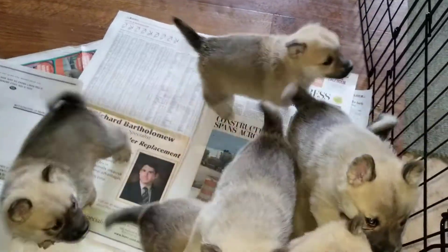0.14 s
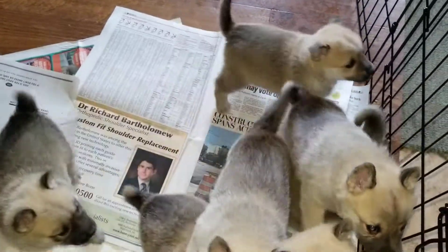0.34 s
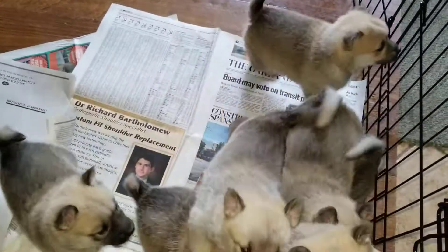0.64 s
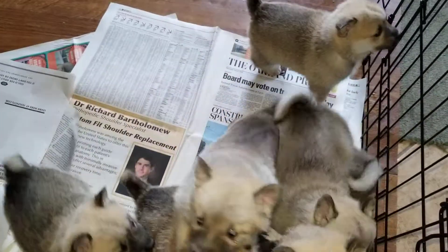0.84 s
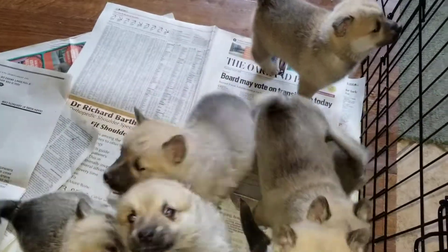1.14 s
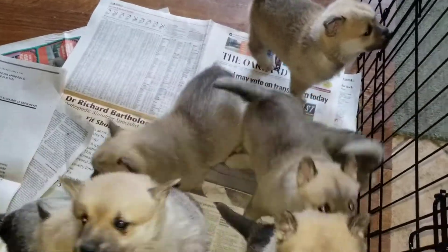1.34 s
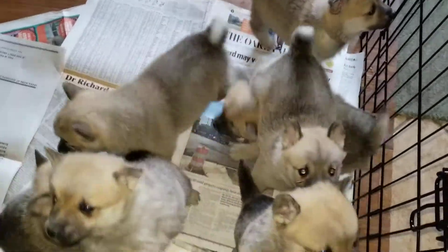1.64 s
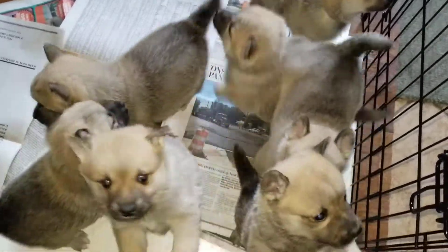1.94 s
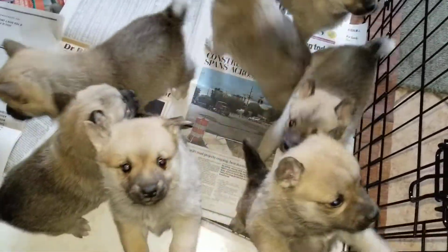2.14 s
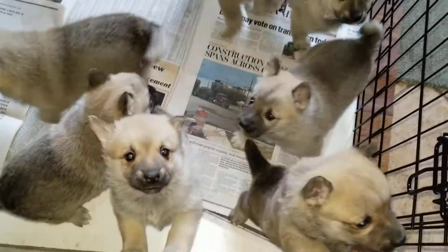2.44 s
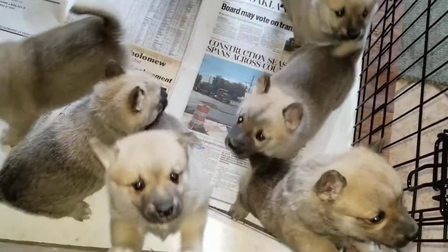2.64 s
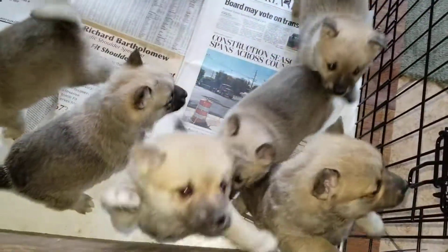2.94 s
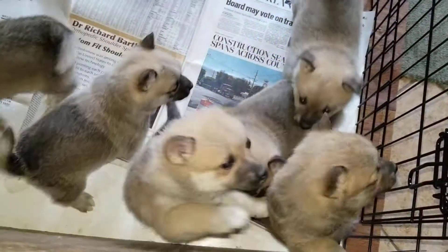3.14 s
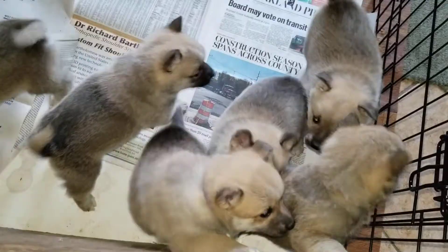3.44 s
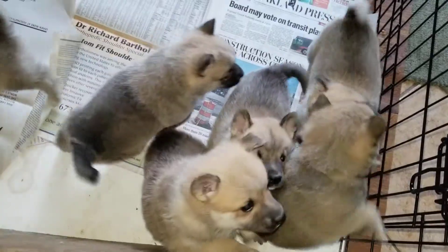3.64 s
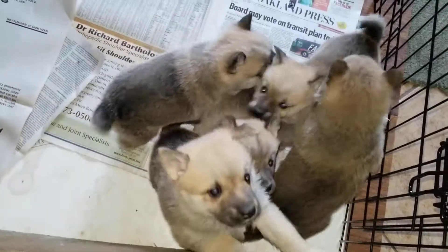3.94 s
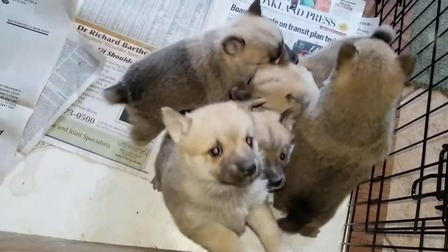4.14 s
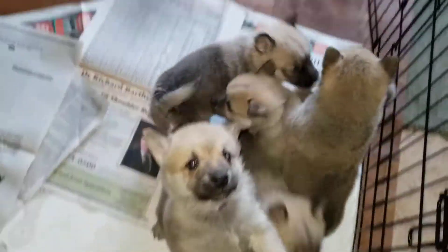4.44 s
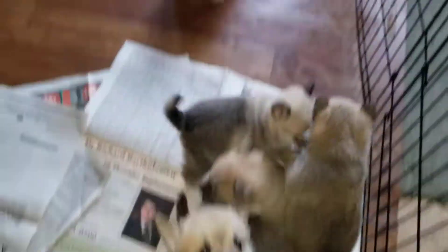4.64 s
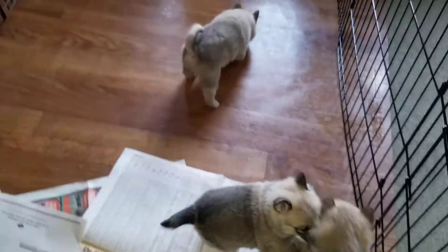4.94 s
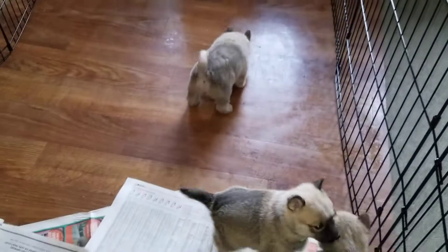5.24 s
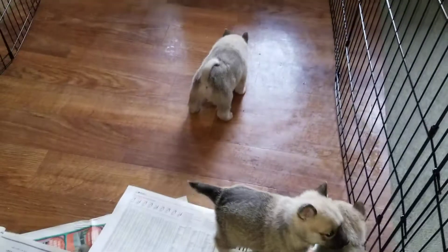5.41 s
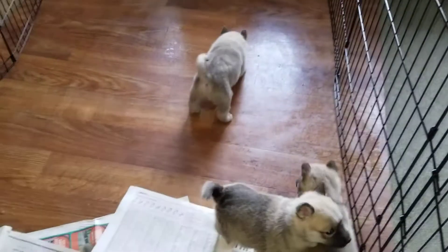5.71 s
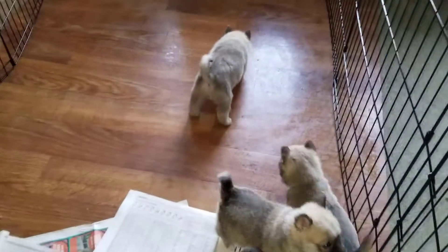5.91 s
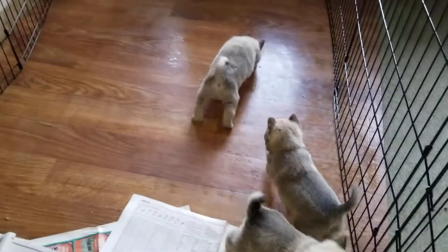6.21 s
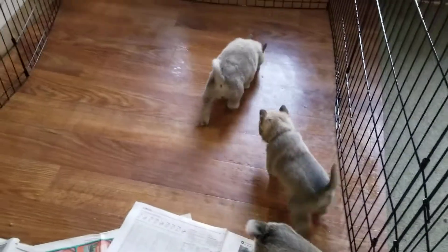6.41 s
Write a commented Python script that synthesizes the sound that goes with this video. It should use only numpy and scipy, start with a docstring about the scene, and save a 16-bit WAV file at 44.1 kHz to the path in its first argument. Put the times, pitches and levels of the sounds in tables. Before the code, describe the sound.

Young puppies are heard close up in a small, lightly echoing room, over steady soft room noise and a faint low appliance hum. From the start, paws swipe and shuffle on newspaper in bright crackling hisses, with snaps and claw ticks. A faint whimper opens; from 0.7 to 1.3 s brief clear whines flick in pitch, with low rough grunts until about 1.6 s and soft floor thumps around 1.1-1.4 s. A longer whine dips and rises from 1.7 to 2.5 s, overlapped by a short one. Higher whines follow at 2.75 and 3.0 s, with thin whistles; strong swipes and a sharp snap come between 2.6 and 3.9 s. Softer whimpers sound at 3.6 and 4.0 s, a firmer falling one at 4.5 s. Rustling then eases to light ticks. A short high whine at 5.85 s leads to the two loudest, at 6.1 and 6.4 s, with faint whistles.

```python
"""Puppies in a pen whine in clean gliding tones, some with a thin high whistle on top, and grunt.
The voices are sums of harmonic partials on gliding pitches; the whistles are a second oscillator.
Their paws drag over newspaper: shaped noise hisses, crackles and snaps, and bodies bump the floor.
Behind them are steady room noise and a wavering appliance hum. A small room echoes the voices and
snaps, and two microphone ports with resonances and a band limit receive the whole."""
import sys
import numpy as np
from scipy import signal
from scipy.fft import rfft, irfft, next_fast_len
from scipy.io import wavfile
from scipy.ndimage import uniform_filter1d

SR = 44100
rng = np.random.default_rng(int(sys.argv[2]) if len(sys.argv) > 2 else 0)


def bounce(signal):
    """Save signal as a 16-bit WAV file at the path given by the first command-line argument."""
    frames = np.transpose(np.atleast_2d(signal))
    limited = np.clip(frames, -1, 1)
    pcm = np.round(limited * 32767).astype(np.int16)
    wavfile.write(sys.argv[1], SR, pcm)


N = 289761  # length in samples


def amp(db):
    """Decibel law: level in dB to amplitude gain."""
    return 10 ** (np.asarray(db) / 20)


def evened(x):
    """Normalization to unit root-mean-square."""
    return x / np.sqrt(np.mean(x ** 2) + 1e-20)


def read(points, hz):
    """Interpolation on a logarithmic frequency axis."""
    table_hz, value = np.transpose(points)
    return np.interp(np.log(hz + 1), np.log(table_hz + 1), value)


def add(mix, start_s, sound):
    """Superposition: lays a two-channel sound into the mix."""
    part = mix[:, max(round(start_s * SR), 0):][:, :sound.shape[1]]
    part += sound[:, :part.shape[1]]


def panned(x, pan_db):
    """Interaural level difference: left minus right dB, split evenly over the two ports."""
    return x * amp(np.array([[.5], [-.5]]) * pan_db)


def wander(count, size):
    """Low-passed random fluctuation of unit rms, smoothed over size samples."""
    return evened(uniform_filter1d(uniform_filter1d(rng.standard_normal(count), size), size))


# Path of the long whine: time_s, pitch_hz, level_db
LONG_PATH = [(1.715, 955, -44.5), (1.771, 1112, -47), (1.811, 1092, -53), (1.919, 1078, -48.5),
             (1.99, 957, -35.5), (2.075, 808.5, -35), (2.19, 810, -32.5), (2.239, 879, -35.5),
             (2.31, 918, -36), (2.37, 1038, -43), (2.46, 1005, -54)]
# Timbre of the long whine: pan_db (left minus right), second_partial_db, upper_partials_db,
# flicks (time_s, pitch_change_percent)
LONG_TIMBRE = (7, 0.95, 8.7, [(1.775, 3.8), (2.04, 4.4), (2.12, 8.9), (2.225, 3.04), (2.285, 4.5),
               (2.345, 3.8)])
# Short whines: start_s, rise_s, fall_s, start_pitch_hz, peak_pitch_hz, end_pitch_hz, peak_db, end_db,
# pan_db (left minus right), second_partial_db, upper_partials_db, flicks (time_s, pitch_change_percent)
SHORT_WHINES = [(.068, 0.039, .11, 802, 635.5, 681, -46, -53, 6.4, -8, 7, [(.15, 6), (.195, -5.5)]),
                (.668, .1, 0.043, 1254, 1275, 1174, -35, -39, 5.6, -42, 4.5, [(.687, 12), (.734, 4.8),
                (.785, 7.7)]),
                (.953, 0.048, 0.025, 1122, 1081, 1104, -35, -46, 4.8, -11.5, 8.5, [(.955, 6.5),
                (1.014, 7.7)]), (.953, .014, 0.022, 1860, 1633, 1680, -40.5, -53, 13, -32, -5, []),
                (1.171, 0.078, 0.033, 1094, 1125, 1090, -35.5, -42, 4.7, -28, 10, [(1.18, 10.5),
                (1.253, 16)]), (1.188, .037, .027, 1675, 1663, 1940, -32.5, -43, 10.5, -23, -10, []),
                (1.272, 0.066, 0.095, 1030, 1079, 1032, -37, -47, 6, -5.5, 16.5, []),
                (1.521, 0.11, 0.055, 967, 967, 1000, -63.5, -68, 7.5, 9.5, 0, []),
                (2.09, 0.094, 0.023, 1165, 1206, 1120, -37, -37, 8.8, -14.5, -9, []),
                (2.491, 0.044, 0.059, 1080, 1248, 978, -35, -47, 6.8, -14, -13, []),
                (2.752, 0.065, 0.044, 1408, 1461, 1175, -33.5, -44.5, 12.2, -24, 2.5, []),
                (3.032, 0.059, .11, 1513, 1577, 1448, -36, -47, 6.1, -26, 9.5, []),
                (3.628, 0.049, .08, 1094, 960, 1035, -47, -58.5, 8.5, 1, -17, []),
                (4.038, 0.084, 0.11, 1119, 1098, 1052, -47, -47.5, 6.2, -4.5, 14.5, [(4.198, -10)]),
                (4.491, 0.066, 0.068, 1229, 1132, 933, -32, -53, 5.5, -13.5, 4, [(4.513, 7.3)]),
                (5.851, 0.027, 0.023, 1547, 1565, 1472, -37.5, -45, 12.4, -51, -1, []),
                (6.09, 0.096, 0.058, 1568, 1559, 1630, -23.5, -33, 6.8, -29, 4.5, [(6.108, 7), (6.147, 6),
                (6.21, 3.8)]),
                (6.407, 0.089, .11, 1493, 1400, 1308, -26, -25, 7.6, -23.5, -6.5, [(6.445, 7),
                (6.51, 3.7)])]
WHINE_SWELL_DB = -6  # level at the start, relative to the peak
STEADY_WAVER, STEADY_SHIMMER_DB = .006, 1.0  # rms pitch fraction and rms level of a steady whine
SOFT_DB, UNSTEADY_PER_DB = -38, .12  # short whines softer than SOFT_DB shake more


def whines():
    """Harmonic series on a gliding fundamental; softer short calls are less steady."""
    out = np.zeros((2, N))
    add(out, *call(*LONG_TIMBRE, LONG_PATH, STEADY_WAVER, STEADY_SHIMMER_DB, partials=11))
    for row in SHORT_WHINES:
        peak_db, end_db = row[6:8]
        path = arch(row[:3], row[3:6], peak_db, WHINE_SWELL_DB, end_db - peak_db)
        shake = 1 + UNSTEADY_PER_DB * np.clip(SOFT_DB - peak_db, 0, 10)
        waver, shimmer_db = STEADY_WAVER * shake, STEADY_SHIMMER_DB * shake ** 1.5
        add(out, *call(*row[8:], path, waver, shimmer_db, partials=11))
    return out


# Grunts: start_s, rise_s, fall_s, start_pitch_hz, peak_pitch_hz, end_pitch_hz, peak_db, second_partial_db
GRUNT_CALLS = [(.665, 0.024, 0.026, 566, 655, 960, -42, -1), (.733, .012, 0.026, 554, 560, 590, -44.5, -6),
               (.785, 0.029, 0.06, 472, 392, 434, -44.5, -3.5),
               (0.874, .035, 0.049, 351, 270, 225, -49.5, 0.5),
               (1.398, 0.028, 0.069, 268, 279, 264, -44, -13),
               (1.598, 0.029, .05, 380, 390, 380, -56.5, -18)]
GRUNT_SWELL_DB, GRUNT_FADE_DB = -1, -8.5  # start and end level, relative to the peak
GRUNT_PAN_DB = 3  # left minus right


def grunts():
    """Random frequency and amplitude modulation roughens two low partials."""
    out = np.zeros((2, N))
    for row in GRUNT_CALLS:
        path = arch(row[:3], row[3:6], row[6], GRUNT_SWELL_DB, GRUNT_FADE_DB)
        add(out, *call(GRUNT_PAN_DB, row[7], 0, [], path, waver=0.039, shimmer_db=5.1, partials=2))
    return out


# Whistles: start_s, rise_s, fall_s, start_pitch_hz, peak_pitch_hz, end_pitch_hz, peak_db,
# pan_db (left minus right), second_partial_db
WHISTLE_CALLS = [(0.666, 0.011, 0.044, 8953, 9220, 9600, -41.5, -14, -30),
                 (1.009, 0.015, 0.018, 9950, 9550, 8100, -31, -6, -30),
                 (2.733, 0.029, .045, 9540, 9200, 14000, -44, -20, -27),
                 (3.022, 0.17, .065, 9180, 9300, 8600, -40.5, -13, -36),
                 (3.985, 0.04, 0.083, 7850, 7800, 8200, -46, 10.5, -40),
                 (5.775, 0.069, 0.072, 8030, 7730, 7980, -37.5, 22.5, -5),
                 (6.045, .043, .03, 7700, 7950, 7820, -38.5, 24, -3),
                 (6.16, 0.085, .04, 7800, 7500, 8500, -49.5, 21.5, 0),
                 (6.385, 0.028, 0.036, 8600, 7940, 9000, -47, 24, -46),
                 (6.447, 0.013, 0.21, 8700, 8560, 10200, -33.5, 9.5, -36)]
WHISTLE_SWELL_DB, WHISTLE_FADE_DB = -17, -24  # start and end level, relative to the peak


def whistles():
    """Second oscillator of the throat: a high tone with one overtone."""
    out = np.zeros((2, N))
    for row in WHISTLE_CALLS:
        path = arch(row[:3], row[3:6], row[6], WHISTLE_SWELL_DB, WHISTLE_FADE_DB)
        add(out, *call(*row[7:], 0, [], path, waver=0.005, shimmer_db=2.2, partials=2))
    return out


# Throat colour of the upper partials: frequency_hz, level_db (relative to the fundamental)
THROAT_COLOUR = [(2500, -68), (3600, -32.5), (4150, -20.5), (4500, -23), (4900, -29), (5300, -31),
                 (5700, -16.5), (6400, -35), (8000, -40), (12000, -37), (14000, -31), (15500, -28)]
ATTACK_S, CLOSE_S = 0.0091, 0.0027  # a call opens and shuts
FLICK_S, FLICK_DB_PER_PERCENT = .022, 0.295  # a flick is a quick jump of pitch; level moves with it


def call(pan_db, second_db, upper_db, flicks, path, waver, shimmer_db, partials):
    """Source-filter principle: vocal-fold partials on one pitch, the upper ones coloured by the throat."""
    path_s, *columns = np.transpose(path)
    start_s, end_s = path_s[0], path_s[-1]
    t = np.arange(start_s, end_s, 1 / SR)
    hz, db = (uniform_filter1d(np.interp(t, path_s, c), size=300) for c in columns)

    flick_percent = sum(percent * np.exp(-(2 * (t - at) / FLICK_S) ** 2) for at, percent in flicks)
    hz = hz * (1 + flick_percent / 100)
    db = db + FLICK_DB_PER_PERCENT * flick_percent
    phase = 2 * np.pi * np.cumsum(hz * (1 + waver * wander(len(t), size=350))) / SR

    opening_db = 4.2 * (np.minimum((t - start_s) / 0.19, 1) - 1)  # the mouth opens into the call
    second_gain = amp(second_db + opening_db + 2.9 * wander(len(t), size=600))
    tone = np.sin(phase) + second_gain * np.sin(2 * phase)
    for k in range(3, partials + 1):
        flicker_db = 4.5 * wander(len(t), size=400)
        gain = amp(upper_db + read(THROAT_COLOUR, k * hz) + flicker_db)
        tone += (k * hz < EDGE_HZ) * gain * np.sin(k * phase)

    gate = np.clip(np.minimum((t - start_s) / ATTACK_S, (end_s - t) / CLOSE_S), 0, 1)
    level = amp(db + shimmer_db * wander(len(t), size=300))
    return start_s, panned(np.sqrt(2) * tone * gate * level, pan_db)


BEND = 1.496  # exponent above 1: pitch and level linger near the peak


def arch(times, pitches, peak_db, swell_db, fade_db):
    """Pitch glide and amplitude envelope: both bend from start to peak to end."""
    (start, rise, fall), (start_hz, peak_hz, end_hz) = times, pitches
    t = np.linspace(0, rise + fall, 40)
    before = np.clip(1 - t / rise, 0, 1) ** BEND
    after = np.clip((t - rise) / fall, 0, 1) ** BEND
    hz = peak_hz + (start_hz - peak_hz) * before + (end_hz - peak_hz) * after
    return np.transpose([start + t, hz, peak_db + swell_db * before + fade_db * after])


VOICE_LAG_S = .00008  # the voices reach the left port first


def puppies():
    """Arrival-time difference: a linear phase shift delays all voices at the right port."""
    left, right = whines() + grunts() + whistles()
    size = next_fast_len(N)
    delay = np.exp(-2j * np.pi * np.fft.rfftfreq(size, 1 / SR) * VOICE_LAG_S)
    return np.array([left, irfft(rfft(right, size) * delay, size)[:N]])


# Paper colour, a relative noise spectrum: frequency_hz, density_db (per Hz)
PAPER_COLOUR = [(180, -63), (300, -14.5), (859, -10), (1460, -10.5), (3490, -8.5), (5290, -5.5),
                (12600, -0.5), (15200, -3), (16200, -3.5)]


def rubbed_paper():
    """Friction noise filtered into a bright part and a low part, each of unit rms."""
    def low_share(hz):
        return np.clip(np.log(7500 / (hz + 1)) / .5, .001, 1)

    def bright_db(hz):
        return read(PAPER_COLOUR, hz) - 3.75 * low_share(hz)

    def low_db(hz):
        return read(PAPER_COLOUR, hz) + 20 * np.log10(low_share(hz))

    bright = evened(hiss(bright_db, size=256, patchy_db=2.5))
    return bright, evened(hiss(low_db, size=256, patchy_db=3.5))


# Slow shuffling on paper: time_s, level_db, low_part_db (relative to the level)
SHUFFLES = [(0, -44.5, -5), (0.399, -44.5, -16.5), (.66, -47.5, -8.5), (.84, -43, -16), (1.1, -53.5, -6.5),
            (1.4, -38, -9), (1.57, -48.5, -10), (2.2, -43, -6.5), (2.56, -49, -15), (2.7, -40.5, -6.5),
            (3.18, -46, -24), (3.4, -46, -2), (3.81, -58, -9), (3.93, -34.5, -11.5), (4.1, -49, -10.5),
            (4.74, -53.5, 1), (4.92, -46.5, -10), (6.2, -50, -8), (6.37, -57, -11), (6.57, -45, -7)]
# Swipes of a paw: peak_s, level_db, length_s (time scale), low_part_db (relative to the level),
# pan_db (left minus right)
PAW_SWIPES = [(0.167, -41, 0.065, -3, -1), (0.284, -33, 0.037, -27, 4), (0.44, -33, 0.17, -20.5, 2),
              (0.53, -29.5, 0.094, -16.5, -2), (0.828, -29.5, 0.081, -35, -2.5),
              (0.929, -34.5, 0.063, -16.5, 0), (1.126, -37.5, 0.048, -1.5, 1),
              (1.265, -32.5, 0.082, -9.5, 0.5), (1.417, -31.5, .1, -14, -1), (1.905, -34, 0.16, -24, 0.5),
              (2.402, -41.5, 0.24, -7.5, -2), (2.647, -26.5, 0.065, -26, 0), (2.832, -29.5, 0.063, -35, -2),
              (2.92, -28.5, 0.051, -19, -1.5), (3.31, -42.5, 0.072, -9.5, 2), (3.537, -30, 0.079, -37, 0.5),
              (3.699, -38, 0.099, -4, -1.5), (3.379, -43.5, 0.038, -8.5, 3), (3.869, -29, 0.076, -33, -4),
              (4.25, -40.5, 0.07, -30, -9), (4.38, -42, 0.2, -13.5, -1), (4.577, -41, 0.11, -9, -1),
              (4.691, -42, 0.04, 2.5, -1), (4.798, -39.5, 0.11, -53, 1), (5.253, -37, 0.041, -17, 5),
              (5.414, -43, 0.032, -14, 5), (5.703, -43.5, 0.044, -24, 4), (6.233, -39.5, 0.073, -14, 4.5),
              (6.514, -39.5, 0.29, -28, 9)]


def drag():
    """Stick-slip friction: shuffles and swipes add in power and crackle modulates their hiss."""
    t = np.arange(N) / SR
    s, db, low_db = np.transpose(SHUFFLES)
    bright_level = amp(np.interp(t, s, db)) * np.ones((2, 1))
    low_level = bright_level * amp(np.interp(t, s, low_db))
    for peak_s, db, length_s, low_db, pan_db in PAW_SWIPES:
        late = (t - peak_s) / length_s
        rise = np.exp(-(2.32 * late) ** 2)
        fall = np.exp(-2.2 * np.abs(late) ** 1.49)  # dies more slowly than it rises
        swipe = panned(amp(db) * np.where(late < 0, rise, fall), pan_db)
        bright_level = np.hypot(bright_level, swipe)
        low_level = np.hypot(low_level, swipe * amp(low_db))

    bright, low = rubbed_paper()
    grain_db = 3.5 * np.minimum(rng.exponential(1, N), 5)
    grains = amp(grain_db) * (rng.random(N) < 180 / SR)  # about 180 grains a second
    crackle = signal.oaconvolve(grains, np.exp(-np.arange(600) / 49.0))[:N]  # each crease lets go at once
    return (bright * bright_level + amp(5.5) * low * low_level) * evened(1 + .5 * crackle)


# Paper snaps and claw ticks: start_s, relative_level_db, relative_low_part_db, pan_db (left minus right)
SNAP_HITS = [(0.22, -22, -32, 0), (0.279, -21.5, -45, 0), (0.365, -32, -27, -3), (0.4264, -29, -5, -3),
             (0.5154, -32, -36, -3), (0.8047, -21, -46, 0), (0.8961, -35.5, 12, 6), (1.1085, -21.5, -9, 0),
             (1.164, -29.5, 2, 7), (1.2191, -21.5, -10, 1), (1.352, -33, -33, -2), (1.3759, -18, -37, -5),
             (1.7684, -29.5, -24.5, -0.5), (1.8284, -28, -38.5, 8), (2.5788, -22, -11.5, 3),
             (2.655, -30, -28, -1), (2.8953, -27.5, -10.5, 2), (2.9946, -22.5, -5.5, 5.5),
             (3.5135, -18.5, -19, 2), (3.5999, -22, -18, 1), (3.686, -35, -25, 2), (3.8362, -27, -40, -9),
             (3.8533, -14, -34, 1), (4.0314, -28, -2, 2), (4.1641, -26, -2.5, 1), (4.2283, -26.5, -47, -2),
             (4.3179, -23.5, -47.5, -3), (4.518, -27.5, -28, 4.5), (4.6055, -29.5, -5, 6),
             (4.678, -28.5, -7, 2), (4.997, -30, -6, 5), (5.076, -38, 4, 2), (5.1544, -32.5, -8.5, -1),
             (5.218, -34, -18, -7), (5.348, -38, -32.5, -14), (5.507, -39, 4, 6), (5.549, -35, 0.5, 6),
             (5.7404, -31, -11, 9.5), (5.9588, -37.5, 4, 13.5), (6.3137, -33.5, 0, 5.5)]
RATTLE_T60_S = 0.15


def snaps():
    """Impulsive excitation: a sharp tick and a dying rattle, reaching one port a little early."""
    out, t, hz = np.zeros((2, N)), np.arange(8192) / SR, np.fft.rfftfreq(8192, 1 / SR)
    envelope = 0.47 * amp(-60 * t / 0.018) + 0.22 * amp(-60 * t / RATTLE_T60_S)
    low_share = np.clip(np.log(4500 / (hz + 1)), 0, 1)
    for start_s, db, low_db, pan_db in SNAP_HITS:
        lag_s = rng.uniform(-16.5, 16.1) / SR
        noise = rng.standard_normal((3, 8192))
        colour_db = read(PAPER_COLOUR, hz) + low_share * (low_db + 10.5)
        z = rfft(noise[0] + 0.44 * noise[1:]) * amp(colour_db)  # shared noise plus each port's own
        z[1] *= np.exp(-2j * np.pi * hz * lag_s)
        add(out, start_s, panned(amp(db) * evened(irfft(z)) * envelope, pan_db))
    return out


# Bodies on the floor: start_s, relative_level_db, upper_part_db (relative to the low puff)
FLOOR_BUMPS = [(0.126, -36, -12), (0.429, -41, 4), (1.097, -27.5, -12), (1.22, -26.5, 0),
               (1.414, -27.5, -22), (2.619, -46, 6.5), (3.68, -38, -26), (3.851, -39, -29),
               (4.047, -34.5, -10), (4.677, -49, -9), (5.075, -41.5, 11.5), (5.103, -46, 14),
               (5.195, -43.5, 9), (5.72, -42, -20), (6.038, -42, 5.5)]


def bumps():
    """Damped impact: band-limited noise, a low puff and a higher slap, with a rounded start."""
    out, t, hz = np.zeros((2, N)), np.arange(8192) / SR, np.fft.rfftfreq(8192, 1 / SR)
    onset = 1 - np.exp(-t / 0.0036)
    for start_s, db, upper_db in FLOOR_BUMPS:
        z = rfft(rng.standard_normal(8192))
        puff, slap = (evened(irfft(z * np.exp(-(np.log((hz + 1) / centre_hz) / .5) ** 2)))
                      for centre_hz in (112., 560.))
        decay = amp(db - 11.5 - 60 * t / 0.21)
        add(out, start_s, panned(decay * (puff + amp(upper_db) * slap) * onset, 3.5))
    return out


# Room noise, a relative spectrum: frequency_hz, density_db (per Hz)
AIR_COLOUR = [(15, -56), (25, -5.5), (114, 4.5), (166, -6.5), (243, -2.5), (328, -7), (579, -21.5),
              (995, -18), (8230, -12.5), (12400, -59), (14900, -7.5), (16200, -3.5)]
AIR_DB = -46
# Appliance hum: frequency_hz, level_db
HUM_TONES = [(118.4, -62), (242.2, -68)]


def air():
    """Stationary ambient noise: a broadband hiss and hum tones of slowly wavering level."""
    t = np.arange(N) / SR
    hum = np.zeros(N)
    for hz, db in HUM_TONES:
        hum += np.sqrt(2) * amp(db + 1.4 * wander(N, size=1500)) * np.sin(2 * np.pi * hz * t)
    noise = evened(hiss(lambda hz: read(AIR_COLOUR, hz), size=1024, patchy_db=1.5))
    return amp(AIR_DB) * noise + panned(hum, 2.5)


# Likeness of noise at the ports: frequency_hz, correlation (no unit)
PORT_LIKENESS = [(60, 0.93), (240, 0.9), (950, 0.28), (3770, -0.031), (15000, -0.0044)]
# Port balance for noise: frequency_hz, left_minus_right_db
PORT_BALANCE = [(60, 3), (240, 3), (950, 5.0), (3770, 4), (15000, -0.5)]


def hiss(level_db, size, patchy_db):
    """Partially coherent noise from random short-time spectra, shaped by level_db(hz)."""
    frames, hz = N // (size // 4) + 5, np.fft.rfftfreq(size, 1 / SR)
    a, b, c, d, patches = rng.standard_normal((frames, len(hz), 5)).T
    patches = uniform_filter1d(uniform_filter1d(patches, size=5, axis=0), size=12, axis=1)
    same = np.clip(read(PORT_LIKENESS, hz), -1, 1)[:, None]
    left, other = a + 1j * b, c + 1j * d
    z = np.array([left, same * left + np.sqrt(1 - same ** 2) * other])
    z *= amp(level_db(hz[:, None]) + patchy_db * evened(patches))
    z *= amp(np.array([.5, -.5])[:, None, None] * read(PORT_BALANCE, hz)[:, None])
    return signal.istft(z, nperseg=size, noverlap=3 * size // 4)[1][:, :N]


# Reverberation time: frequency_hz, t60_s
ROOM_DECAY = [(200, 1), (1500, 0.44), (6000, 0.41), (15000, 0.03)]


def room(x):
    """Reverberation: sparse taps of random sign for each port, each band dying at its own speed."""
    taps = np.zeros((2, SR // 2))
    at = np.arange(200, SR // 2 - 20, 20)
    at = at + rng.integers(0, 20, (2, len(at)))
    np.put_along_axis(taps, at, rng.choice([-1., 1.], at.shape), 1)
    hz, t, z = signal.stft(taps, SR, nperseg=256)
    z = z * np.clip(hz / 700, 0, 1)[:, None]  # little bass comes back
    decay = amp(-60 * t / read(ROOM_DECAY, hz)[:, None])
    tail = signal.istft(z * decay, SR, nperseg=256)[1]
    return signal.fftconvolve(x, tail / np.linalg.norm(tail[0]), axes=1)[:, :N]


def scene():
    """Superposition of all sources, with the echo of the voices and snaps."""
    voices, hits = puppies(), snaps()
    echo = amp(-12.5) * room(voices) + amp(-2) * room(hits)
    return voices + hits + echo + bumps() + drag() + air()


# Resonances of the microphone port: frequency_hz, width_hz, gain_db
PORT_RESONANCES = [(8600, 1200, 3), (12700, 1600, 5)]
EDGE_HZ = 15850  # upper band limit


def record(dry):
    """Resonance and low-pass filtering: the port's peaks, then the band limit."""
    size = N + N % 2
    hz = np.fft.rfftfreq(size, 1 / SR)
    colour_db = sum(db / (1 + (2 * (hz - peak_hz) / width) ** 2) for peak_hz, width, db in PORT_RESONANCES)
    coloured = irfft(rfft(dry, size) * amp(colour_db))[:, :N]
    low_pass = signal.firwin(511, EDGE_HZ, window=("kaiser", 9), fs=SR)
    return signal.oaconvolve(coloured, low_pass[None], "same")


dry = scene()
out = record(dry)
bounce(out)
```